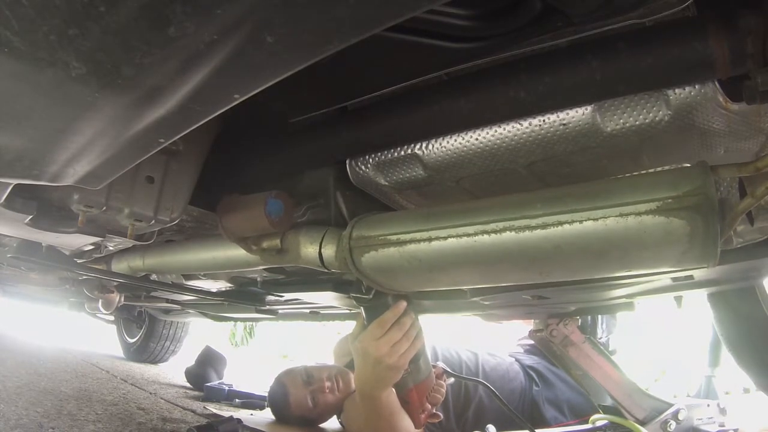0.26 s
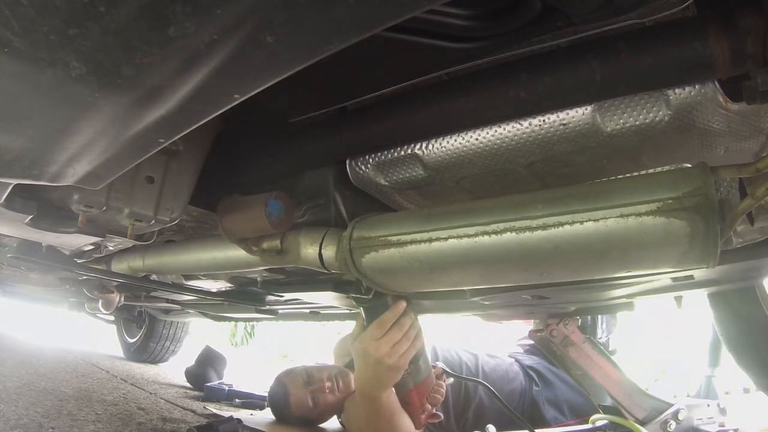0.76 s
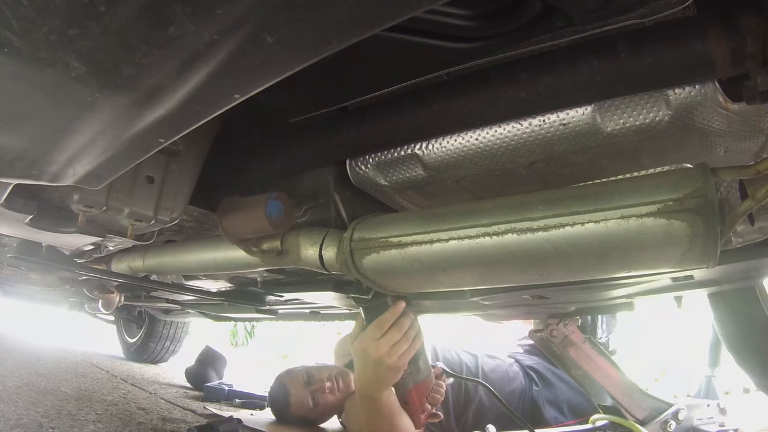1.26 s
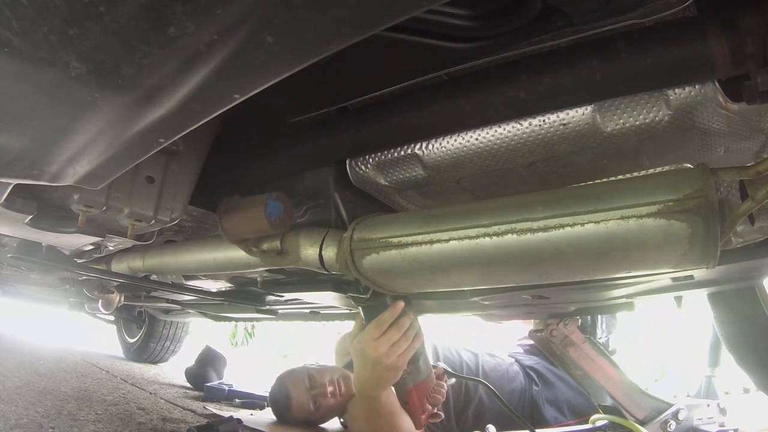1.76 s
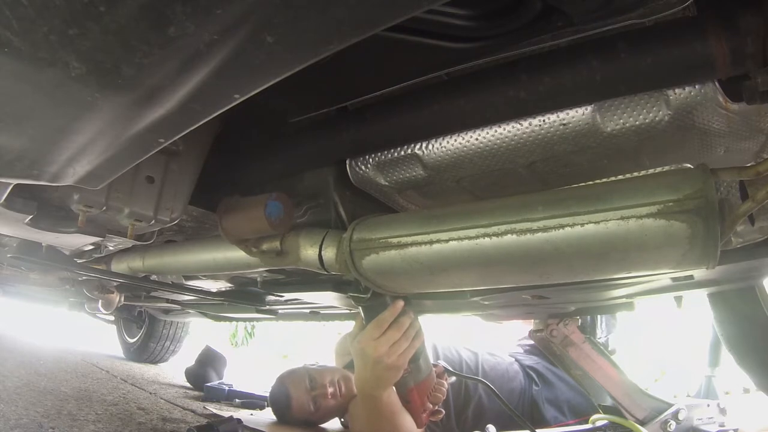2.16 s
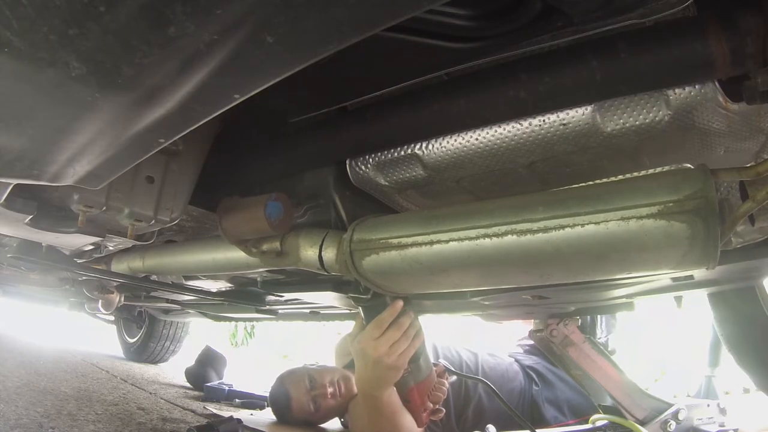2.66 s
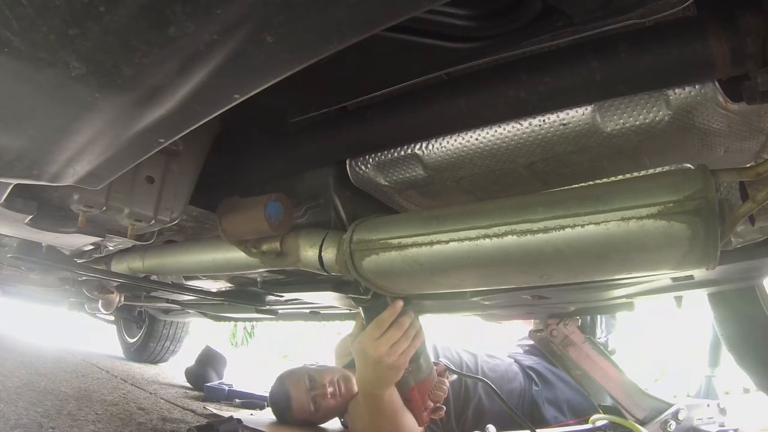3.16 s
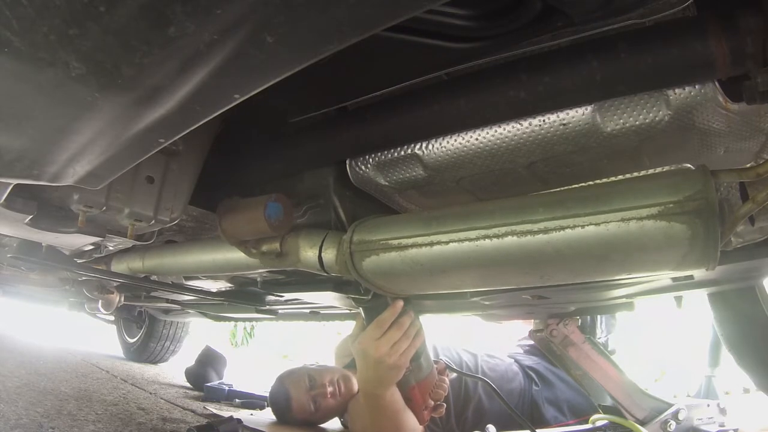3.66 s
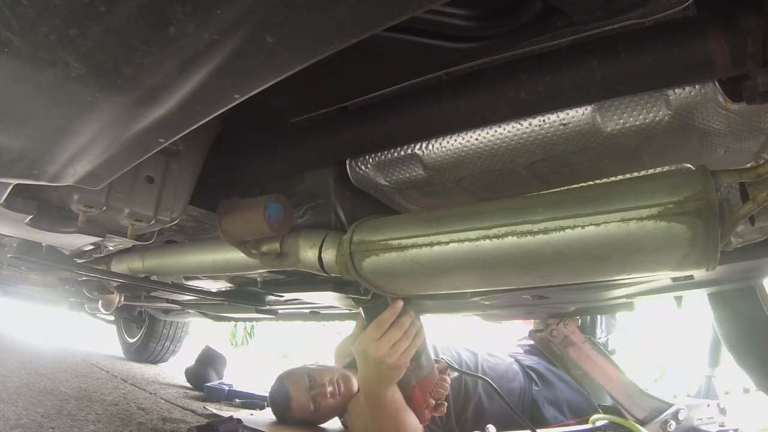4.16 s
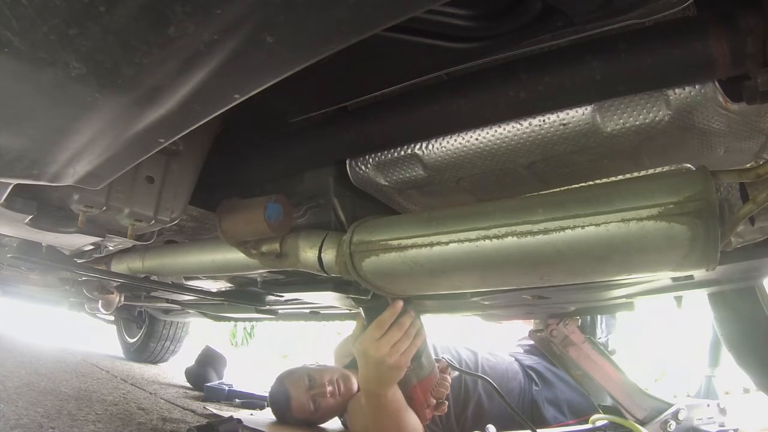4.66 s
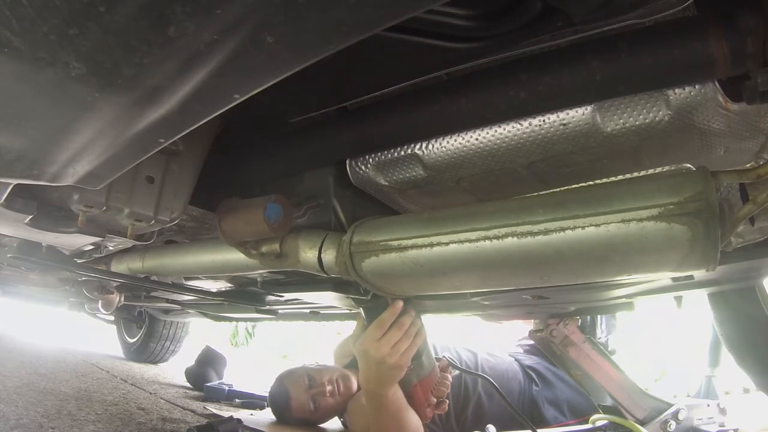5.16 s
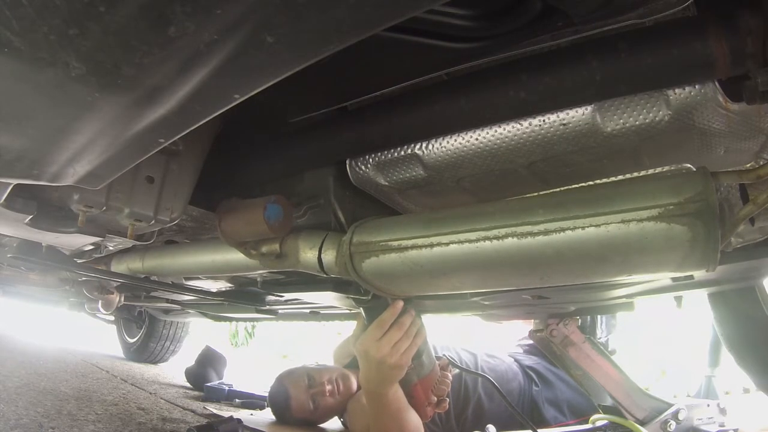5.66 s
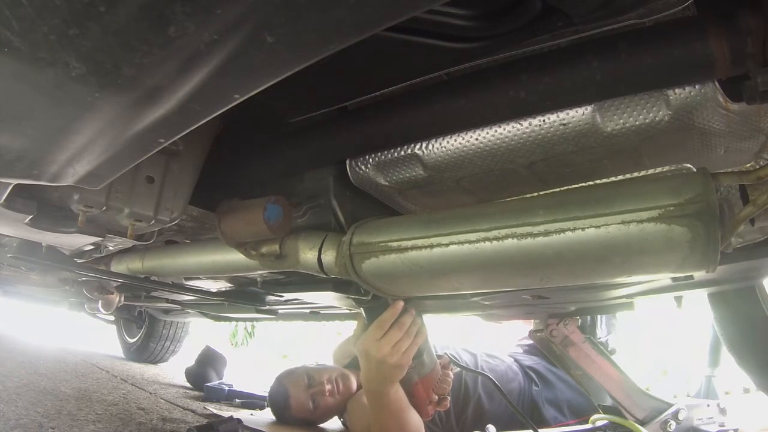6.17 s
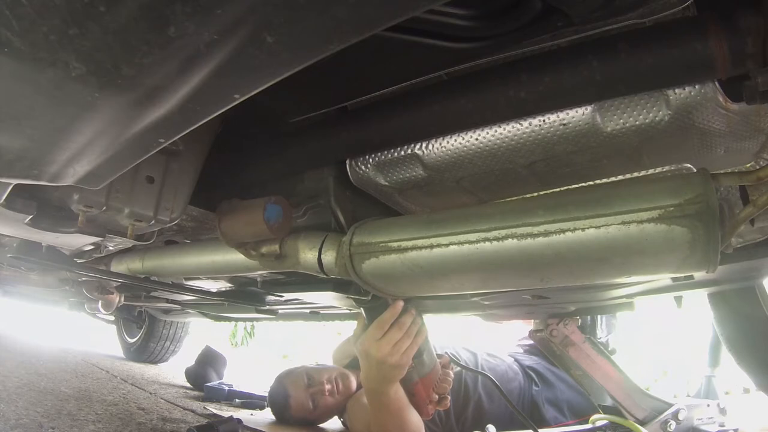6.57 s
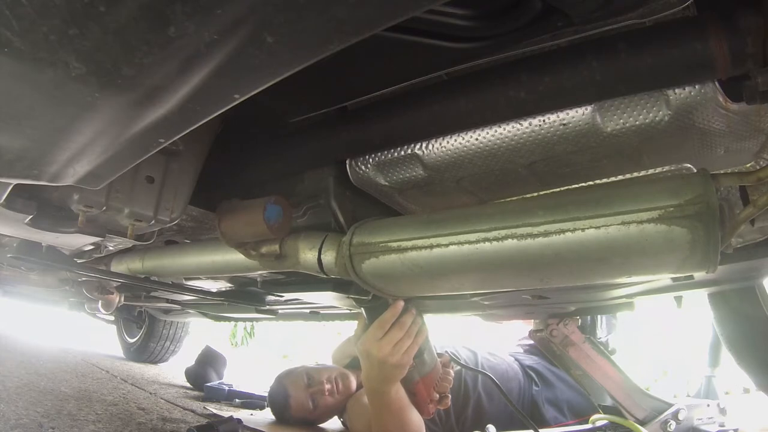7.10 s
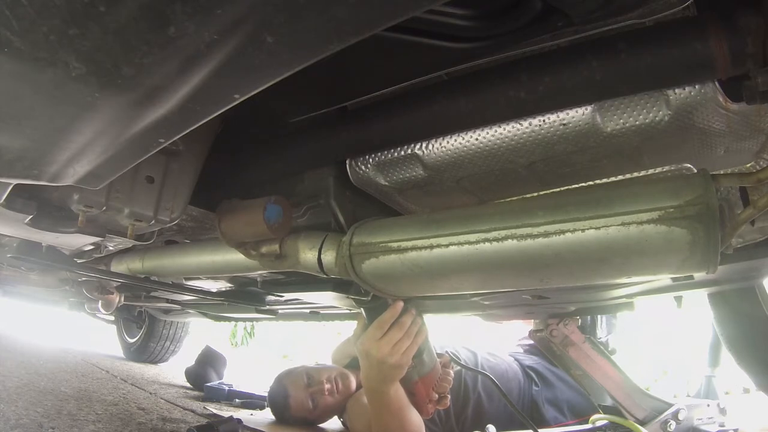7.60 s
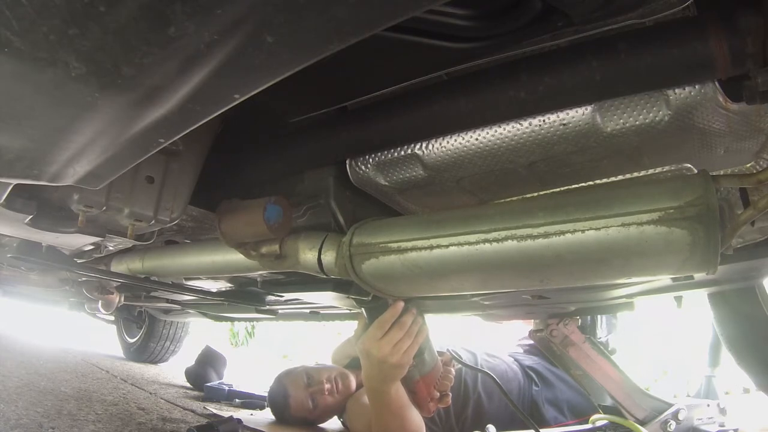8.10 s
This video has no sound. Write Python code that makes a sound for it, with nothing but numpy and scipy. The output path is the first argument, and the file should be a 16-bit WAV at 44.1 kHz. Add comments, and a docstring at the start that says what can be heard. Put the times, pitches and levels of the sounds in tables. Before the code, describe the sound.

Under a car, a corded reciprocating saw is already cutting a steel exhaust pipe, its chattering strokes quickening over the first three seconds into a fast, steady metallic buzz. Pipe and blade ring harshly, with brief nasal squeals flaring and fading. Later bites grow louder and rougher, and the saw is still cutting at the end. Close mono small-camera pickup, bright and slightly compressed, with very little low rumble.

```python
"""Under a car, a reciprocating saw runs up to speed and cuts a steel exhaust pipe, heard from close by.
Its teeth make a rasp, noise that partly repeats from stroke to stroke, jolted at each end of the stroke.
The rasp rings the pipe, its wall and the blade (narrow filters) and a heat shield (a short noisy tail).
The crank hums faintly in sine tones on multiples of the stroke rate; soft low bumps come and go,
and under it all lies a low rumble of shaped noise."""
import sys
import numpy as np
from scipy import signal
from scipy.fft import rfft, irfft, next_fast_len
from scipy.io import wavfile
from scipy.ndimage import uniform_filter1d

SR = 44100
rng = np.random.default_rng(int(sys.argv[2]) if len(sys.argv) > 2 else 0)


def persist_wave(psi):
    """Save psi, clipped to +-1, as 16-bit WAV."""
    counts = np.round(np.clip(psi, -1, 1) * 32767).astype(np.int16)
    wavfile.write(sys.argv[1], SR, np.atleast_2d(counts).T)


N = 367794
T = np.arange(N) / SR  # time of each sample, s

# How fast the saw runs: t/s, strokes per second/Hz
STROKE_RATE = [(0, 21.8), (.2, 24.3), (.42, 28.6), (.62, 29.8), (1.0, 34), (1.3, 35.9), (2.0, 38.3),
               (3.04, 39.9), (3.65, 39.35), (5.15, 38.96), (6.1, 38.6), (7.5, 38.68), (8.34, 39.1)]
FIRST_TURN = .5  # where the crank starts, in turns; one turn is one stroke
# How the sound of the cut shifts: t/s, balance between two ringing colours/0-1,
# share of the rasp that repeats each stroke/0-1
CUT_COLOUR = [(0, 0., 0.96), (2.2, 0.45, 0.47), (3.2, 0.35, 0.87), (4.8, 0.27, 1), (5.6, 0.72, 0.7),
              (6.8, 0.74, 0.65), (7.2, 0.7, 1), (8.34, 0.99, 1)]
# How hard the blade is fed into the cut: t/s, level/dB
FEED = [(0.0, -33.5), (0.16, -28.5), (0.69, -21.5), (0.9, -24), (2.21, -21), (2.35, -19), (2.42, -23),
        (2.53, -19.5), (2.76, -20), (2.81, -16), (2.95, -21.5), (3.04, -18), (3.51, -21), (4.02, -17.5),
        (4.27, -20), (4.34, -17.5), (4.39, -19), (5.39, -18), (5.43, -16), (5.6, -21.5), (6.9, -21),
        (6.97, -15.5), (7.02, -19.5), (7.15, -15.5), (7.57, -19), (7.69, -12), (7.73, -14), (7.85, -12.5),
        (8.01, -21), (8.04, -15), (8.18, -18.5), (8.2, -12.5), (8.22, -15.5), (8.34, -14)]
FULL_FEED_DB = -19  # feed level at which the levels in PART_LEVELS hold
# Pipe, lower wall, upper wall, blade, one row each: level in first colour/dB, level in second colour/dB,
# change per dB of feed/dB, flicker/dB
PART_LEVELS = [(-23.5, -24.5, 0.78, 0.66), (-26, -24, 0.99, 1.), (-26, -26.5, 0.82, 0.5),
               (-36.5, -34, 0.37, .5)]
FLICKER_PER_S = 12.
# Ringing leaning from the lower wall (minus) to the pipe (plus): t/s, level/dB
LEAN = [(0, -0.5), (1.9, -0.5), (2.6, 0.4), (3.4, -0.5), (4.3, 0), (5.43, 0.9), (5.6, -0.7), (6.8, -1),
        (7.27, 0.8), (7.55, 0.7), (7.69, 0), (7.95, -1.8), (8.08, 1.1), (8.2, 0.5), (8.34, -0.5)]
SHRILL_DB = 28.5  # blade gain per tenfold speed
SLOW_LOPE_DB = 3.5  # swell on each pull, per unit of speed still missing

# Ringing notes (modes) of the pipe, its wall and the blade, with levels relative within each table:
# f/Hz, width/Hz, level in first colour/dB, level in second colour/dB
PIPE_MODES = [(819, 31, -15, -24.5), (1009, 32, -12, -23), (1273, 28, 1, -10.5), (1451, 48, 2, -5.5),
              (1563, 15.5, 7.5, -2.5), (1744, 60, -1, 2), (1894, 60, -0.5, -2.5), (2100, 210, -4, -11),
              (2223, 102, 2.5, -8.5), (2392, 14, 0, -3.5)]
WALL_MODES = [(2623, 42, -10.5, -23.5), (2843, 70, -6.5, -16), (2950, 114, -5.5, -3), (3119, 78, -2, 1.5),
              (3234, 51, -4, -0.5), (3329, 60, -1, 2), (3428, 45, 0.5, 3.5), (3570, 31, -5.5, -6),
              (3800, 39, -17, -18), (3967, 65, -3, -4), (4195, 144, -5.5, -9.5), (4402, 76, 2, -3.5),
              (4503, 58, -7, -2.5), (4580, 70, -10, -5), (4716, 69, -2.5, 0.5), (4920, 68, -8.5, -1.5),
              (5160, 84, -10, -18)]
BLADE_MODES = [(5040, 40, -2, 0), (5100, 40, -4, -3), (5245, 40, -7, -6), (5445, 50, -5, -3),
               (5800, 50, -2, -1), (5970, 60, -8, -5), (6585, 50, -4, -4), (6700, 60, 3, 2),
               (6865, 40, 1, 0), (7125, 40, -5, -5), (7243, 40, -3, -3), (7456, 50, -4, -4),
               (7703, 60, -7, -7), (7978, 60, -9, -8), (8120, 50, -5, -5), (8392, 50, -12, -12),
               (8877, 90, -6, -8), (9330, 50, -10, -10), (9614, 80, -7, -7), (10222, 70, -7, -8),
               (10680, 80, -10, -10), (11251, 80, -11, -11), (11595, 60, -13, -14), (11832, 50, -15, -16),
               (12069, 60, -14, -15), (12532, 90, -13, -15), (12919, 60, -19, -16), (14787, 200, -22, -25)]
WALL_SPLIT_HZ = 3700  # between the lower and the upper wall modes
DRIFT_DB = 1.4  # wander of each pipe and wall mode

# Five pipe modes that sing out: f/Hz, width of each of two filters in a row/Hz
SINGING_MODES = [(1009, 30), (1175, 40), (1345, 55), (1622, 75), (1966, 50)]
# Spells in which one of them sings out: centre t/s, length/s, mode f/Hz, level/dB
SINGING_SPELLS = [(.35, .6, 1009, -46), (0.762, 0.6, 1178, -33.5), (1.076, .1, 1178, -29.5),
                  (1.07, .1, 1350, -30), (1.4, 0.14, 1622, -37), (1.759, 0.49, 1350, -32.5),
                  (1.9, .25, 1622, -36.5), (2.358, 0.11, 1622, -26.5), (2.8, .3, 1350, -30.5),
                  (2.804, 0.43, 1622, -30), (2.83, 0.29, 1966, -34), (3.036, 0.09, 1178, -32),
                  (3.043, 0.11, 1350, -25.5), (3.155, .2, 1622, -30), (3.26, 0.17, 1350, -30.5),
                  (3.252, 0.52, 1966, -31), (3.76, 0.37, 1622, -30.5), (3.905, .3, 1178, -36),
                  (4.147, 1, 1350, -29.5), (4.547, 0.92, 1966, -29.5), (4.683, 0.096, 1178, -35),
                  (4.763, 0.43, 1622, -29), (4.805, 0.25, 1350, -30), (1.3, .6, 1350, -35),
                  (5.0, .3, 1622, -35), (5.133, 0.13, 1178, -27.5), (5.21, 0.22, 1622, -26.5),
                  (5.313, 0.091, 1178, -29.5), (5.35, .3, 1350, -34), (5.448, 0.16, 1622, -21),
                  (6.98, .08, 1178, -32), (6.976, 0.072, 1350, -29), (7.243, 0.4, 1622, -23.5),
                  (7.75, 0.35, 1178, -33.5), (7.72, 0.34, 1350, -34.5), (7.75, .35, 1622, -27),
                  (8.057, 0.1, 1622, -22), (8.06, 0.099, 1966, -27), (8.14, 0.33, 1178, -30.5),
                  (8.265, .12, 1966, -26), (8.33, 0.1, 1622, -22)]
MURMUR_DB = -13  # a singing mode between spells, against the pipe
MURMUR_ABOVE_HZ = 1100  # lower singing modes are silent between spells

# Tone of the rasp heard between the modes: f/Hz, relative level per Hz/dB
RASP_TONE = [(500, -32), (1000, -17.5), (1400, -2.5), (2000, -1.5), (2550, -4), (3200, 0.5), (3750, 0),
             (4500, -11), (5300, -7.5), (6800, -5.5), (8500, -11.5), (11000, -12.5), (12800, -19),
             (13400, -26.5), (15400, -26)]
RASP_DB = 5.5  # against the mean of the upper wall and blade levels
SHIELD_T60_S = 0.062  # time for the shield's tail to fall by 60 dB

# Hum of the crank at full speed: multiple of the stroke rate/1, level/dB
CRANK_TONES = [(1, -66.5), (2, -69.5), (3, -71), (5, -65.5), (7, -67), (8, -68), (9, -65.5), (11, -69),
               (14, -69), (15, -67), (19, -78), (20, -63.5), (21, -67.5)]
# Crank multiples that grow for a while: centre t/s, length/s, multiple/1, added level/dB
SHAKES = [(2.8, .9, 3, 8.5), (4.44, .7, 3, 6.5), (1.7, 0.4, 5, 12), (4.7, 1.7, 5, 3.5), (6.9, 2.8, 9, 5.5),
          (6.9, 2.8, 7, 2)]
SHAKE_DB = 220.  # hum gain per tenfold speed
SETTLED = .97  # share of top speed above which the hum holds

# Low bumps: centre t/s, f/Hz, level/dB, length/s
BUMPS = [(0.283, 59.4, -55, 0.14), (0.987, 58, -58, 0.15), (1.65, 56.5, -60, .2), (2.4, 62.5, -56, 0.23),
         (2.88, 72.16, -54, 0.21), (4.099, 68.26, -58, .12), (4.519, 63.98, -57, 0.23),
         (4.979, 64.4, -58, 0.22), (5.32, 64, -53, 0.28), (7.1, 77.2, -57, .2), (7.48, 69, -54, 0.18),
         (7.95, 72, -54.5, 0.36)]

# Tone of the rumble: f/Hz, relative level per Hz/dB
RUMBLE_TONE = [(12, -35), (20, -6), (54, 0), (146, -7), (192, -5), (236, -6), (357, -6), (476, -7.5),
               (900, 2), (1170, 2.5), (1980, -120)]
RUMBLE_DB = -51.5  # at full speed
TOP_HZ = 15290  # treble above this is cut


def saw(turns, speed):
    """The cut: pipe, wall and blade ringing over the bare rasp."""
    balance, share = curves(CUT_COLOUR)
    balance = np.clip(balance, 0, 1)
    pipe_db, lower_db, upper_db, blade_db = loudness(balance, speed)
    lope_db = SLOW_LOPE_DB * (1 - speed) * np.cos(2 * np.pi * (turns - .1))
    jolts = stroke(turns) * undb(lope_db)

    # three independent draws of the rasp, so neighbouring modes do not cancel
    first, second, third = (teeth(turns, jolts) for _ in range(3))
    pair = (first, second)

    lower_modes = [m for m in WALL_MODES if m[0] < WALL_SPLIT_HZ]
    upper_modes = [m for m in WALL_MODES if m[0] >= WALL_SPLIT_HZ]
    ringing = pipe(pair, third, balance, share, undb(pipe_db))
    ringing = ringing + undb(lower_db) * body(lower_modes, pair, balance, share, DRIFT_DB)
    ringing = ringing + undb(upper_db) * body(upper_modes, pair, balance, share, DRIFT_DB)
    ringing = ringing + undb(blade_db) * body(BLADE_MODES, pair, balance, share, drift_db=3.0)
    # keep the ringing thin below about 1 kHz
    thin = signal.butter(2, 950., "highpass", fs=SR, output="sos")

    same, new = third
    bare = colour(.5 * same + 0.72 * new, RASP_TONE)
    bare = 0.6 * bare + 0.58 * shield(bare)
    bare_db = RASP_DB + (upper_db + blade_db) / 2
    return signal.sosfilt(thin, ringing) + undb(bare_db) * bare


def stroke(turns, pull_db=5.5, push_db=4.0, scatter=0.22, fade_turns=0.11):
    """A jolt at each reversal, stronger on the pull and never twice alike, then a fade."""
    pull, push = 1 + scatter * rng.standard_normal((int(turns[-1]) + 2, 2)).T
    half_later = turns + .5
    db = pull_db * pull[turns.astype(int)] * np.exp(-(turns % 1) / fade_turns)
    db = db + push_db * push[half_later.astype(int)] * np.exp(-(half_later % 1) / fade_turns)
    # the level wavers slightly at random
    return undb(db + 0.59 * walk(14.))


def teeth(turns, jolts, memory=0.839, grit_db=1.5):
    """One draw of the rasp: a part that each stroke largely repeats, a part that is new every time."""
    size = 1200  # noise points per stroke
    fresh = rng.standard_normal((int(turns[-1]) + 3, size))
    # the same teeth meet the same burrs, which wear away over a few strokes
    worn = signal.lfilter([1], [1, -memory], fresh, axis=0).ravel()
    same = np.interp(turns * size, np.arange(len(worn)), worn)
    # chips break off as short spikes
    grit = unit(uniform_filter1d(rng.standard_normal(N), size=24))
    new = rng.standard_normal(N) * undb(grit_db * grit)
    return unit(same * jolts), unit(new * jolts)


def loudness(balance, speed):
    """Levels in dB: each ringing part follows the feed, shifts with the balance and flickers on its own."""
    feed_db = curves(FEED)[0] - FULL_FEED_DB
    lean_db = curves(LEAN)[0]
    levels = []
    for first_db, second_db, follow, flicker_db in PART_LEVELS:
        db = first_db + (second_db - first_db) * balance
        levels.append(db + follow * feed_db + flicker_db * walk(FLICKER_PER_S))
    pipe_db, lower_db, upper_db, blade_db = levels
    return pipe_db + lean_db, lower_db - lean_db, upper_db, blade_db + SHRILL_DB * np.log10(speed)


def pipe(pair, third, balance, share, whole):
    """The singing modes take their share of the pipe's power; its other modes fill the rest."""
    sung, taken = 0, 0
    for hz, width in SINGING_MODES:
        power = (undb(MURMUR_DB) * whole * (hz > MURMUR_ABOVE_HZ)) ** 2
        for s, length, mode_hz, db in SINGING_SPELLS:
            if abs(mode_hz / hz - 1) < .06:  # this spell belongs to this mode
                power = power + (undb(db) * swell(s, length)) ** 2
        note = ring(drive(hz, third, share), hz, width)
        note = steady(ring(note, hz, width))
        sung = sung + np.sqrt(power) * note
        taken = taken + power
    # the other modes always keep at least 36 % of the power
    rest = np.sqrt(np.maximum(whole ** 2 - taken, 0.36 * whole ** 2))
    return sung + rest * body(PIPE_MODES, pair, balance, share, DRIFT_DB)


def body(modes, pair, balance, share, drift_db):
    """Modes driven by two draws of the rasp in turn; they shift between two colours and drift slowly."""
    out = 0
    for k, (hz, width, first_db, second_db) in enumerate(modes):
        db = first_db + (second_db - first_db) * balance + drift_db * walk(2.52)
        push = undb(db) * drive(hz, pair[k % 2], share)
        sign = (-1) ** (k // 2)
        out = out + sign * ring(push, hz, width)
    return steady(out)


def drive(hz, rasps, share, reach_hz=2900.0):
    """The rasp that a mode feels: high modes lose step with the stroke."""
    same, new = rasps
    kept = np.clip(share / (1 + (hz / reach_hz) ** 3.2), 0, 1)
    return np.sqrt(kept) * same + np.sqrt(1 - kept) * new


def shield(x):
    """Thin sheet nearby: countless close modes, heard as a short noisy tail."""
    t = T[:SR // 5]
    tail = rng.standard_normal(len(t)) * undb(-60 * t / SHIELD_T60_S)
    return unit(signal.fftconvolve(x, tail)[:N])


def crank(turns, speed):
    """Wavering tones on multiples of the stroke rate; shaking grows steeply with speed."""
    speed_db = SHAKE_DB * np.log10(np.minimum(speed / SETTLED, 1))
    out = 0
    for k, db in CRANK_TONES:
        db = db + speed_db + 1.1 * walk(3.)
        for s, length, multiple, more_db in SHAKES:
            if round(multiple) == round(k):
                db = db + more_db * swell(s, length)
        phase = k * turns + rng.random() + 0.01 * (k + 3) * walk(6.)  # in cycles
        # root 2 makes the level an rms level
        out = out + np.sqrt(2) * undb(db) * np.sin(2 * np.pi * phase)
    return out


def bumps():
    """Soft low swells: sine tones that rise and fall over some cycles."""
    return sum(undb(db) * swell(s, length) * np.sin(2 * np.pi * hz * T) for s, hz, db, length in BUMPS)


def rumble(speed):
    """Low background noise, shaped in tone and growing gently with speed."""
    return speed ** 0.46 * undb(RUMBLE_DB) * colour(rng.standard_normal(N), RUMBLE_TONE)


def ring(x, hz, width):
    """One resonance, a narrow filter with gain 1 at its centre."""
    b, a = signal.iirpeak(hz, hz / max(width, 3.), fs=SR)
    return signal.lfilter(b, a, x)


def steady(x):
    """Hold the slow level at 1 (over a quarter second) while the balance inside shifts."""
    return x / np.sqrt(uniform_filter1d(x ** 2, size=SR // 4))


def swell(s, length):
    """A smooth rise and fall, 1 at its centre."""
    return np.exp(-((T - s) / (length / 2)) ** 2)


def walk(rate):
    """Random levels drawn rate times a second and joined smoothly; rms about 1."""
    steps = np.repeat(rng.standard_normal(int(N / SR * rate) + 3), 8)
    for _ in range(2):
        steps = uniform_filter1d(steps, size=8)
    return np.interp(T * rate * 8, np.arange(len(steps)), unit(steps))


def colour(x, points):
    """Shape noise by a spectrum of (f/Hz, level/dB) points, to rms 1."""
    size = next_fast_len(N)
    hz, db = np.transpose(points)
    axis = np.log(np.arange(1, size // 2 + 2) * SR / size)
    gain = undb(np.interp(axis, np.log(hz), db))
    return unit(irfft(rfft(x, size) * gain, size)[:N])


def curves(table):
    """Columns of a time table, one value a sample."""
    s, *columns = np.transpose(table)
    return [np.interp(T, s, c) for c in columns]


def unit(x):
    """Scale to rms 1."""
    return x / np.sqrt(np.mean(x ** 2))


def undb(db):
    """Turn dB into gain."""
    return np.exp(np.asarray(db) * (np.log(10) / 20))


def scene():
    """Saw, crank hum, bumps and a low rumble, added up in one channel."""
    rate, = curves(STROKE_RATE)
    turns = FIRST_TURN + np.cumsum(rate) / SR
    speed = rate / rate.max()
    mix = saw(turns, speed) + crank(turns, speed) + bumps() + rumble(speed)
    return mix[None]


def record(dry):
    """A small camera rounds the peaks a little and cuts the top."""
    rounded = np.tanh(0.73 * dry) / 0.68
    cut = signal.ellip(18, .3, 100, TOP_HZ, fs=SR, output="sos")
    return signal.sosfilt(cut, rounded)


dry = scene()
out = record(dry)
persist_wave(out)
```